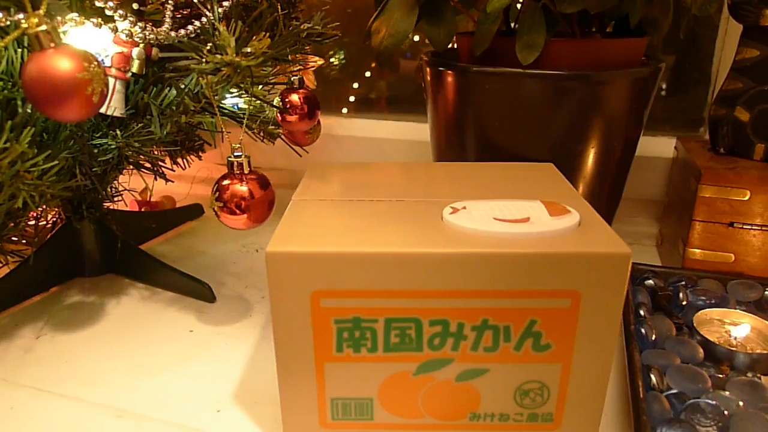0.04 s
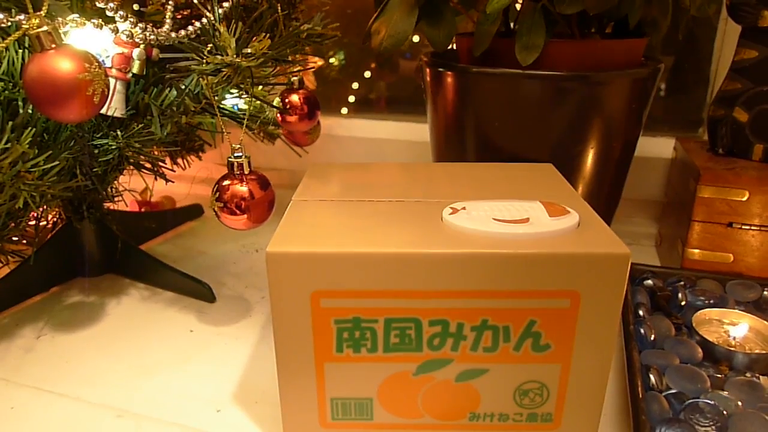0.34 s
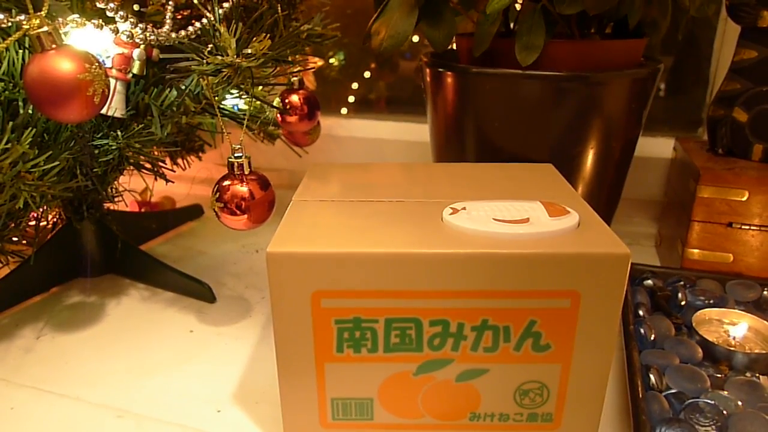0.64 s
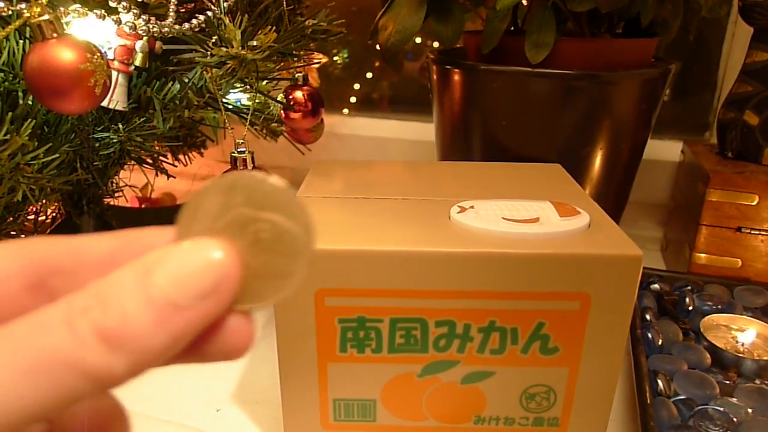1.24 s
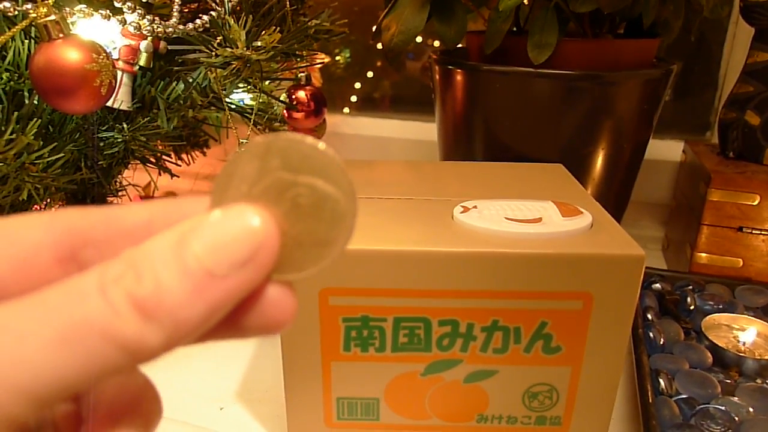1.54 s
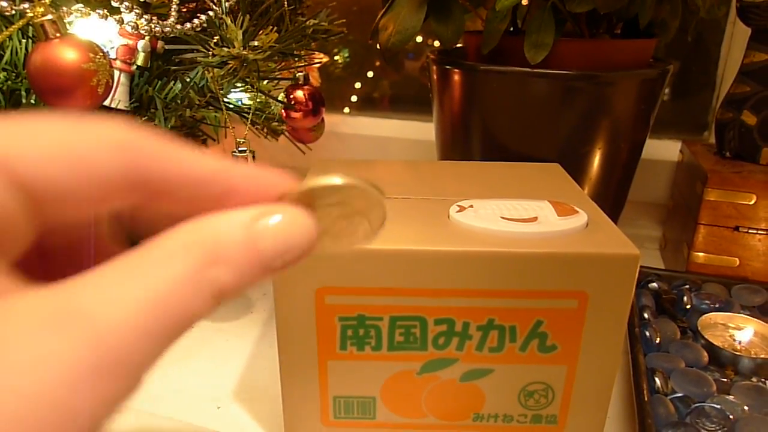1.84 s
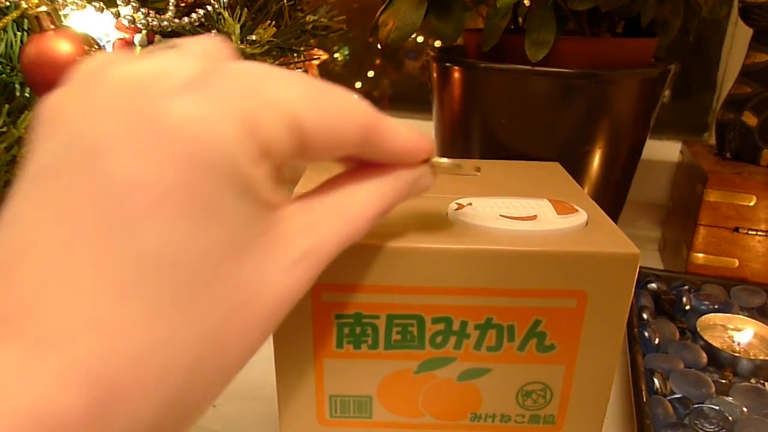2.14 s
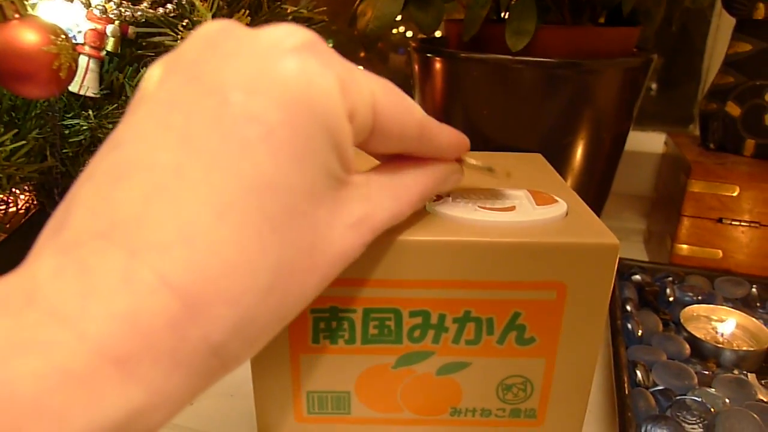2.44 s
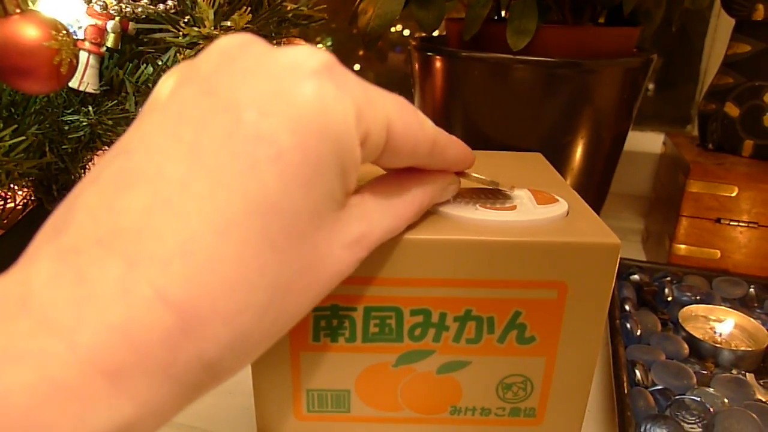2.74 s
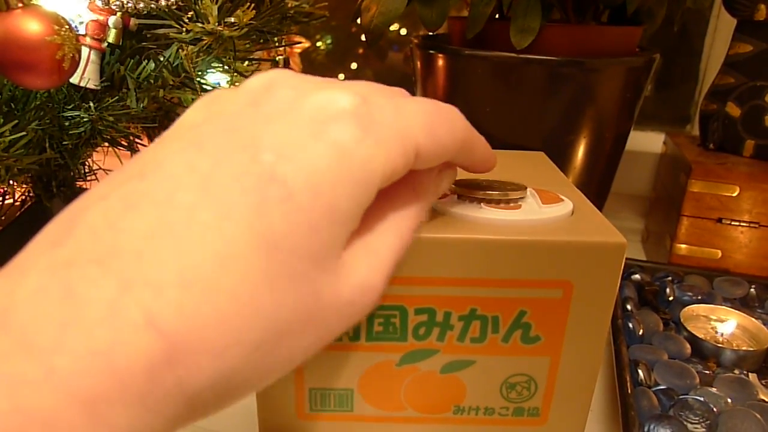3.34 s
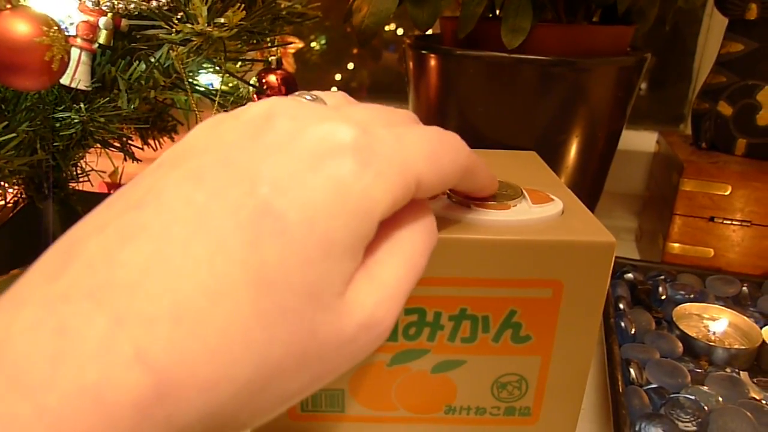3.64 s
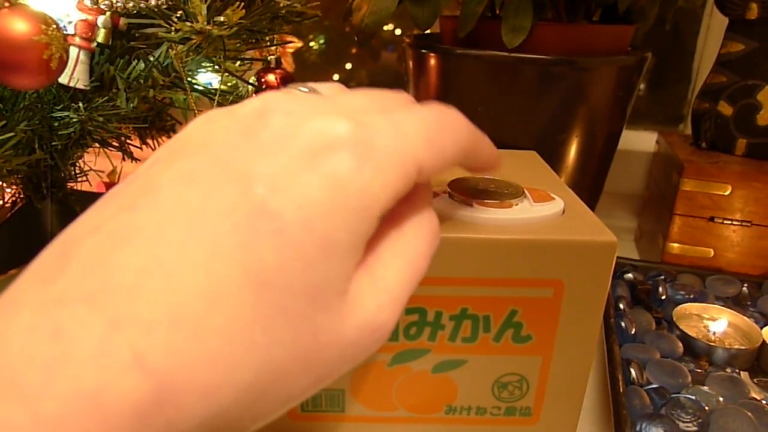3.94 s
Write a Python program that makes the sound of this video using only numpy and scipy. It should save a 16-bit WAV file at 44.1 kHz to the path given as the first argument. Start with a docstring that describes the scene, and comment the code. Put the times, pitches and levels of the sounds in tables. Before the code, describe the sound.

Sharp coin taps on a small plastic bank, with light rattling in a quiet room.

```python
"""A quiet room hisses, with a low hum and a faint whir. Just before one second a hand lifts with a
soft brush, then fingers tick on a coin. After two seconds the arm rustles over a small plastic coin
bank, close by. From 2.5 to 3.5 seconds the coin is tapped and pressed onto the bank's plate: each
contact cracks, knocks the hollow box and rings the plate. Between and after the contacts, the loose
plate rattles in its seat."""
import sys
import numpy as np
from scipy import signal
from scipy.fft import rfft, irfft
from scipy.io import wavfile
from scipy.ndimage import map_coordinates

SR = 44100
rng = np.random.default_rng(int(sys.argv[2]) if len(sys.argv) > 2 else 0)


def inscribe(sig):
    """Save sig as 16-bit PCM at rate SR to the path in sys.argv[1].

    A 1-D sig is mono; a 2-D sig holds one channel per row.
    Samples are clipped to [-1, 1] before scaling.
    """
    pcm = np.round(np.clip(np.atleast_2d(sig).T, -1, 1) * 32767)
    wavfile.write(sys.argv[1], SR, pcm.astype(np.int16))


N = 176400  # 4 seconds


def amp(db):
    """Turn decibels into a gain to multiply by."""
    return 10 ** (np.asarray(db) / 20)


def along(points, hz):
    """Read between (frequency, value) points, spaced by octaves."""
    freqs, values = np.transpose(points)
    return np.interp(np.log(hz + 1), np.log(freqs + 1), values)


def fade(t, fade_s):
    """Die away by 60 dB in the fade time."""
    return np.exp(-np.log(1000) * t / np.maximum(fade_s, 1e-4))


def swell(points):
    """A gain that follows (time, level) points and is silent outside them."""
    times, db = np.transpose(points)
    return amp(np.interp(np.arange(N) / SR, times, db, left=-np.inf, right=-np.inf))


def hump(hz, centre_hz, octaves):
    """A gain that favours the frequencies around a centre."""
    return 1 / (1 + (np.log2((hz + 1) / centre_hz) / octaves) ** 2 / 4) ** 4


def noise(gain):
    """Noise of power 1, its tone shaped by gain(hz)."""
    spectrum = rfft(rng.standard_normal(N)) * gain(np.fft.rfftfreq(N, 1 / SR))
    hiss = irfft(spectrum, N)
    return hiss / np.sqrt(np.mean(hiss ** 2) + 1e-20)


def coloured(sound, gain, size=4096):
    """Shape a sound's tone by gain(hz), with a filter of energy 1."""
    gains = np.maximum(gain(np.fft.rfftfreq(size, 1 / SR)), 1e-6)
    cepstrum = irfft(np.log(gains))
    cepstrum[1:size // 2] *= 2  # folded forward, so nothing rings before the hit
    cepstrum[size // 2 + 1:] = 0
    response = irfft(np.exp(rfft(cepstrum)))
    return signal.fftconvolve(sound, response / np.linalg.norm(response))[:len(sound)]


# Tone of the room's hiss (frequency [Hz], level [dB])
HISS_TONE = [(15, -54), (25, -18.5), (64, -13.5), (84, -7.5), (102, -4.5), (153, -9.5), (185, -8),
             (270, -12.5), (301, -11.5), (988, -14.5), (1100, -18), (1230, -17.5), (1650, -19), (4370, -24),
             (16000, -38)]
# Loudness of the hiss (time [s], level [dB])
HISS_LEVEL = [(.25, -57), (.6, -54), (1.1, -53), (1.9, -52.5), (3, -50), (4.01, -54.5)]
# Loudness of the whir (time [s], level [dB])
WHIR_LEVEL = [(.3, -64), (.9, -64.5), (1.2, -62.5), (2.3, -59), (3.9, -64)]


def room_tone(hum_hz=102, hum_width_hz=1.7, hum_db=-63.5, whir_hz=1228, whir_width_hz=110):
    """A soft hiss with two narrow bands of noise: a wavering low hum and a faint whir."""
    hiss = swell(HISS_LEVEL) * noise(lambda hz: amp(along(HISS_TONE, hz)))
    hum = amp(hum_db) * noise(lambda hz: 1 / (1 + ((hz - hum_hz) / hum_width_hz) ** 2))
    whir = swell(WHIR_LEVEL) * noise(lambda hz: 1 / (1 + ((hz - whir_hz) / whir_width_hz) ** 2))
    return hiss + hum + whir


# The brush of the lifting hand (time [s], level [dB])
BRUSH_LEVEL = [(.68, -80), (.8, -53.5), (.88, -49.5), (.94, -58), (1.0, -60)]
# Tone of the brush (frequency [Hz], level [dB])
BRUSH_TONE = [(300, 3.5), (1500, -5), (2500, -2), (5500, -1), (7500, -5), (11000, -8), (15500, -14)]


def hand_brush():
    """The hand lifts with one quick, soft brush."""
    return swell(BRUSH_LEVEL) * noise(lambda hz: amp(along(BRUSH_TONE, hz)))


def ringing(notes, t, scatter_db=0.95, rise_s=0.00013):
    """A struck object's own notes die away, a little different on each hit."""
    hz, db, fade_s = np.transpose(notes)[:, :, None]
    strength = amp(db + scatter_db * rng.standard_normal(hz.shape))
    phase = rng.uniform(0, 2 * np.pi, hz.shape)
    waves = strength * np.sin(2 * np.pi * hz * t + phase) * fade(t, fade_s)
    return waves.sum(0) * (1 - np.exp(-t / rise_s))


# The hollow box's own notes (frequency [Hz], level [dB], fade time [s])
BOX_NOTES = [(261, -8, 0.083), (310, -4.5, 0.052), (528.6, -6, 0.089), (601, -9.5, 0.1),
             (709.3, 1.5, 0.068), (762, -7, 0.13), (912, -8, 0.087), (1179, -2, 0.047), (1627, -4.5, 0.045),
             (1717, -16, 0.059), (2170, -7, 0.066), (2496, -17, 0.079), (2900, -5, 0.043)]


def box_knock(t):
    """A touch makes the hollow plastic box ring briefly."""
    return ringing(BOX_NOTES, t)


# How long the room echoes (frequency [Hz], fade time [s])
ECHO_FADE = [(200, 0.19), (1000, 0.25), (4000, 0.32), (8000, 0.34), (15000, .25)]
# Tone of the echo (frequency [Hz], level [dB])
ECHO_TONE = [(150, -9), (700, -2.5), (2000, 1), (3900, -5), (5000, -5.5), (6500, -6.5), (8500, -3.5),
             (11000, -5), (15000, -6.5)]


def add_with_echo(track, start_s, sound, echo_db=-17.5, rise_s=0.0013):
    """Put a sound on the track, with the short echo the room gives it."""
    hz, t, spectrum = signal.stft(rng.standard_normal(SR // 2), SR, nperseg=256)
    shape = fade(t, along(ECHO_FADE, hz)[:, None]) * amp(along(ECHO_TONE, hz))[:, None]
    tail = signal.istft(spectrum * shape, SR, nperseg=256)[1]
    tail *= 1 - np.exp(-np.arange(len(tail)) / SR / rise_s)
    heard = amp(echo_db) * signal.fftconvolve(sound, tail / np.linalg.norm(tail))
    heard[:len(sound)] += sound
    part = track[round(start_s * SR):][:len(heard)]
    part += heard[:len(part)]


def light_touches(rows, box_db, rise_s=0.00021):
    """Each touch is a short burst of noise around one pitch, plus a little of the box's knock."""
    track, t = np.zeros(N), np.arange(SR // 4) / SR
    for start_s, db, centre_hz, octaves, fade_s in rows:
        envelope = fade(t, fade_s) * (1 - np.exp(-t / rise_s))
        tick = coloured(envelope * rng.standard_normal(len(t)), lambda hz: hump(hz, centre_hz, octaves))
        tick *= np.linalg.norm(envelope) / np.linalg.norm(tick)
        add_with_echo(track, start_s, amp(db) * (tick + amp(box_db) * box_knock(t)))
    return track


# Fingers on the coin (time [s], level [dB], pitch [Hz], width [octaves], fade time [s])
FINGER_TICKS = [(.988, -43, 2320, 0.18, .02), (1.0115, -31.5, 1970, 0.36, 0.022),
                (1.012, -39, 2890, 0.16, 0.038), (1.027, -32.5, 1500, 1.83, 0.014),
                (1.0275, -38, 8500, 0.21, 0.011), (1.028, -50, 80, .8, .06),
                (1.2522, -35.5, 1100, 0.31, 0.017), (1.258, -38, 1210, 0.65, .02),
                (1.663, -35, 840, 0.94, 0.053), (1.669, -41, 544, 0.33, 0.061),
                (1.742, -52.5, 2680, 0.42, 0.069), (2.0445, -38, 2020, 0.2, 0.044),
                (2.06, -51, 2330, 0.31, 0.036), (3.578, -45, 135, 0.52, 0.16),
                (3.622, -39.5, 272, 0.51, 0.015)]


def finger_ticks():
    """Fingers tick and bump on the coin, barely sounding the box."""
    return light_touches(FINGER_TICKS, box_db=-25.5)


# The arm's rustle (time [s], level [dB])
RUSTLE_LEVEL = [(2.2, -62), (2.33, -59), (2.45, -50), (2.6, -54.5), (2.75, -52.5), (2.9, -51), (3.1, -52.5),
                (3.35, -66), (3.6, -64), (3.9, -93)]
# Tone of the rustle (frequency [Hz], level [dB])
RUSTLE_TONE = [(100, -5), (400, -3), (800, -2), (1600, 1.5), (2550, 2), (3300, -2), (4300, -1),
               (5200, -1.5), (6600, -4.5), (7500, -12), (11000, -13), (15500, -18)]
# The arm's dull rubbing (time [s], level [dB])
RUB_LEVEL = [(2.12, -79), (2.25, -57.5), (2.38, -55), (2.48, -54), (2.6, -55.5), (2.9, -68), (3.2, -66),
             (3.36, -55.5), (3.6, -58), (3.85, -64)]


def arm_rustle(wobble_db=2, wobbles_per_s=36):
    """The arm rustles and rubs unevenly as it reaches over the box."""
    rustle = swell(RUSTLE_LEVEL) * noise(lambda hz: amp(along(RUSTLE_TONE, hz)))
    rub = swell(RUB_LEVEL) * noise(lambda hz: hump(hz, centre_hz=376, octaves=0.69))
    steps = np.arange(N) * wobbles_per_s / SR
    wobble = map_coordinates(rng.standard_normal(2000), [steps], mode="wrap")  # smooth random curve
    return (rustle + rub) * amp(wobble_db * wobble)


# The plate's rattles (time [s], level [dB], pitch [Hz], width [octaves], fade time [s])
PLATE_RATTLES = [(2.507, -42.5, 900, 2.2, .09), (2.6215, -38, 1820, 0.62, 0.021),
                 (2.685, -41.5, 845, 1.05, 0.13), (2.8095, -32, 830, 1.08, 0.025),
                 (2.9405, -30, 1160, 0.95, 0.032), (2.974, -37.5, 2200, 1.16, 0.056),
                 (2.9745, -30.5, 1220, 0.18, 0.07), (3.0205, -33.5, 1280, 0.77, 0.03),
                 (3.094, -35, 1180, 1.1, 0.091), (3.113, -29.5, 1170, 1.33, 0.041),
                 (3.13, -44, 890, 1.3, 0.16), (3.411, -39.5, 694, .9, 0.2), (3.585, -43, 593, 1.3, 0.06),
                 (3.640, -40.5, 1900, .8, .035), (3.706, -44, 880, 1.13, 0.17),
                 (3.722, -44.5, 834, 0.98, 0.23), (3.749, -47, 1220, 1.2, 0.03),
                 (3.779, -39.5, 740, 0.93, .1), (3.815, -55, 6760, 0.52, 0.054)]


def plate_rattle():
    """The loose plate ticks in its seat and lightly knocks the box."""
    return light_touches(PLATE_RATTLES, box_db=-11)


# The coin hitting the plate (time [s], snap [dB], crack [dB], knock [dB], ring [dB],
# crack's treble limit [Hz], crack's fade time [s], pitch boosted by the spot it hits [Hz],
# that boost [dB], bass limit [Hz])
COIN_TAPS = [(2.5198, -17, -18, -24.5, -49, 4730, 0.039, 1630, 6, 418),
             (2.6243, -24.5, -20.5, -24.5, -42, 4470, 0.044, 1150, 4.5, 170),
             (3.1482, -41, -22.5, -29, -31, 8500, 0.12, 8400, 6, 300),
             (3.1544, -31, -23, -28.5, -22.5, 11000, 0.027, 10400, 9, 297),
             (3.158, -10.5, -15, -22, -29, 10200, 0.068, 8400, 6, 190),
             (3.4934, -23, -18.5, -30, -36, 13000, 0.031, 8200, 10.5, 547),
             (3.5097, -13, -18.5, -26, -21.5, 10200, 0.06, 4250, 3.5, 170)]
# Tone of the plastic's snap and crack (frequency [Hz], level [dB])
PLASTIC_TONE = [(30, -42), (120, -28), (250, 0.5), (430, -4), (700, -2), (1500, 0), (3000, 2), (4400, 1.5),
                (5300, -0.5), (6800, 2.5), (7400, -10.5), (8400, -5), (11000, -4), (13300, -4.5),
                (15500, -7)]
# The coin's and plate's own notes (frequency [Hz], level [dB], fade time [s])
RING_NOTES = [(3215, 0, .055), (3585, -15, .12), (3996, -4, .07), (4192, -3, .05), (4480, -4, .04),
              (6047, -4, .06), (6230, -2, .06), (6520, -5, .05), (6726, -5, .06), (6883, -3, .06),
              (7020, -7, .05), (8278, -10, .07), (8711, -9, .06), (13250, -13, .06)]


def coin_taps(snap_fade_s=0.0083, push_db=11.5, snap_treble_hz=8500, spot_octaves=0.16):
    """Each tap gives a bright snap and a longer plastic crack, knocks the box and rings the plate."""
    track, t = np.zeros(N), np.arange(SR // 3) / SR
    for start_s, snap_db, crack_db, knock_db, ring_db, *tone in COIN_TAPS:
        treble_hz, fade_s, spot_hz, spot_db, bass_hz = tone
        force = rng.standard_normal(len(t)) * fade(t, snap_fade_s)
        force[0] = amp(push_db)  # one sharp push as the coin lands
        snap = coloured(force, lambda hz: amp(along(PLASTIC_TONE, hz)) / np.hypot(1, hz / snap_treble_hz))
        burst = rng.standard_normal(len(t)) * fade(t, fade_s)  # the plastic's many notes blur into noise
        crack = coloured(burst, lambda hz: amp(along(PLASTIC_TONE, hz))
                         / np.hypot(1, (hz / treble_hz) ** 3))
        tap = amp(snap_db) * snap + amp(crack_db) * crack
        tap += amp(knock_db) * box_knock(t) + amp(ring_db) * ringing(RING_NOTES, t)
        tap = coloured(tap, lambda hz: amp(spot_db * hump(hz, spot_hz, spot_octaves))
                       / np.hypot(1, (bass_hz / (hz + 1)) ** 2))
        add_with_echo(track, start_s, tap)
    return track


def scene():
    """All the sounds together, close by, in one channel."""
    return (room_tone() + hand_brush() + finger_ticks() + arm_rustle() + plate_rattle() + coin_taps())[None]


def record(dry, start_s=0.297, top_hz=15750):
    """The sound begins after a moment of silence, and its highest treble is cut away."""
    opened = dry * (np.arange(N) / SR > start_s)
    hz = np.fft.rfftfreq(N, 1 / SR)
    return irfft(rfft(opened) / np.hypot(1, (hz / top_hz) ** 80), N)


dry = scene()
out = record(dry)
inscribe(out)
```